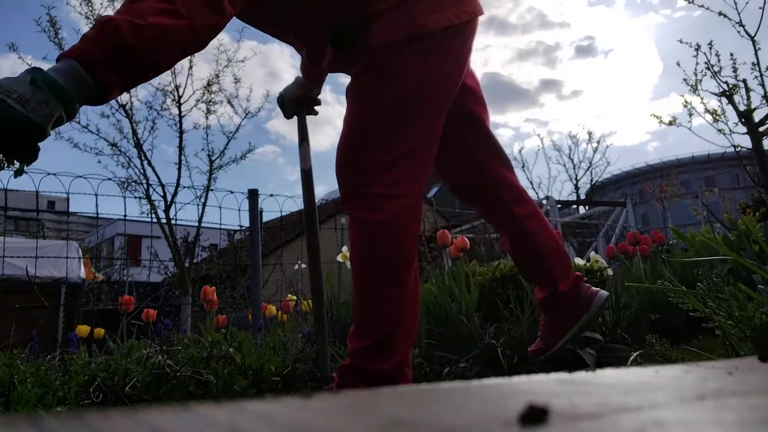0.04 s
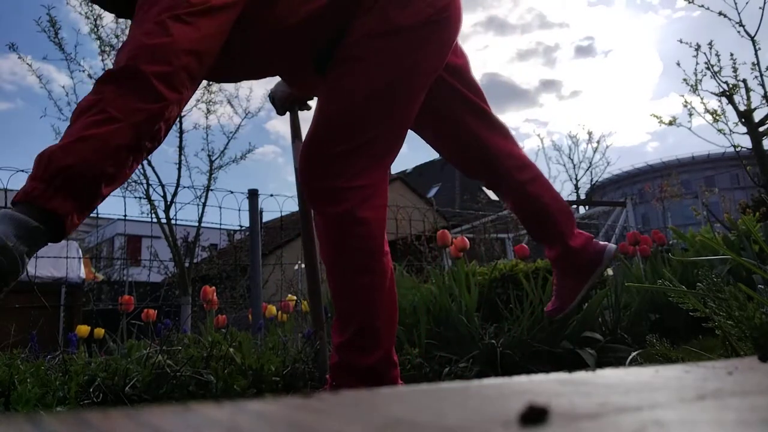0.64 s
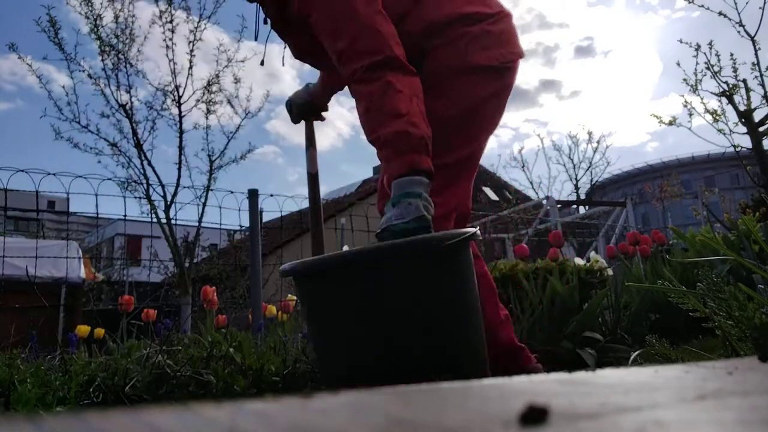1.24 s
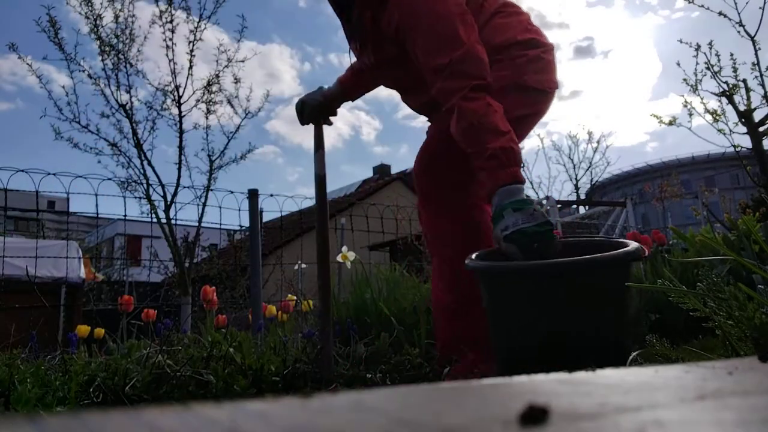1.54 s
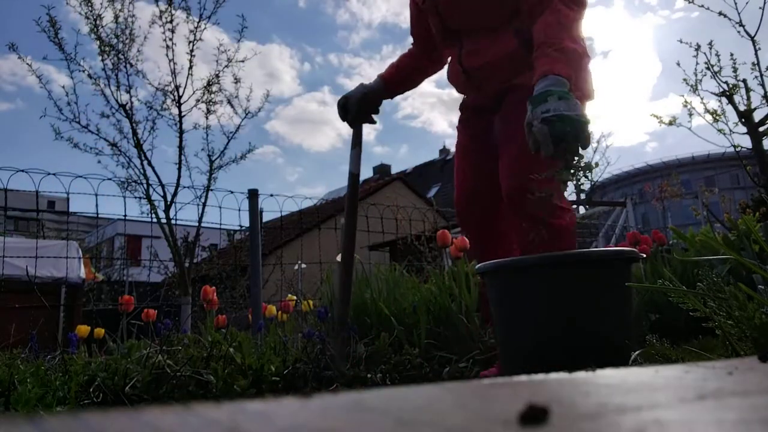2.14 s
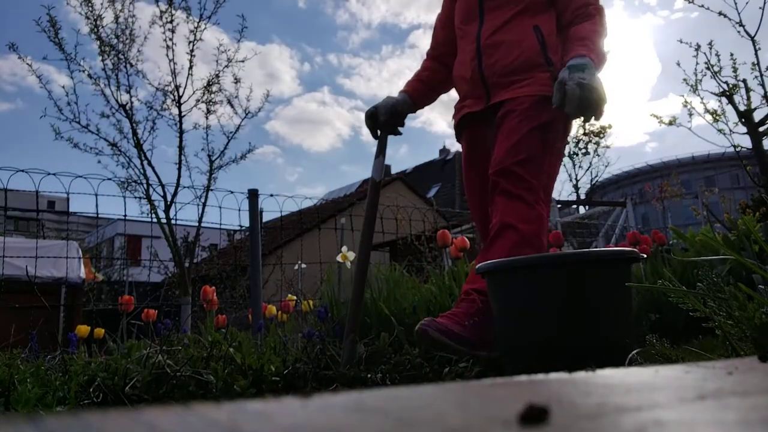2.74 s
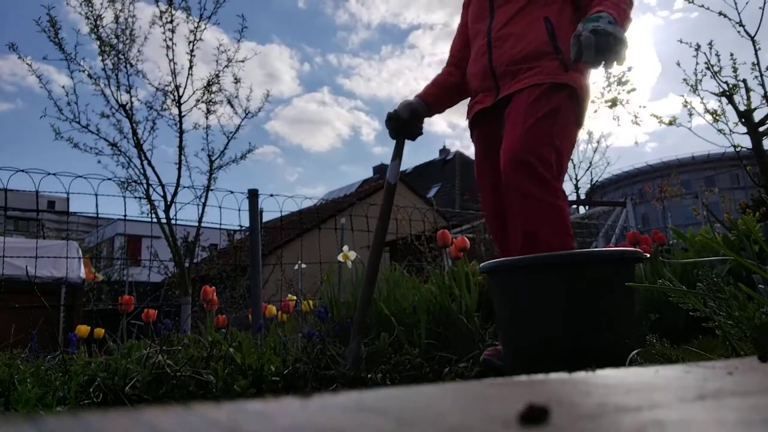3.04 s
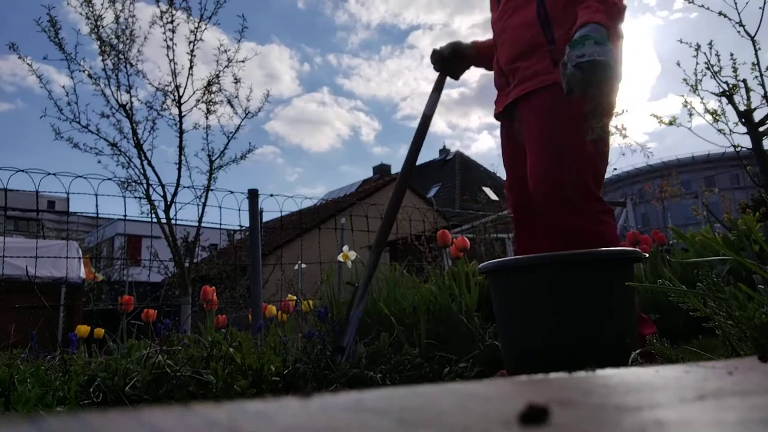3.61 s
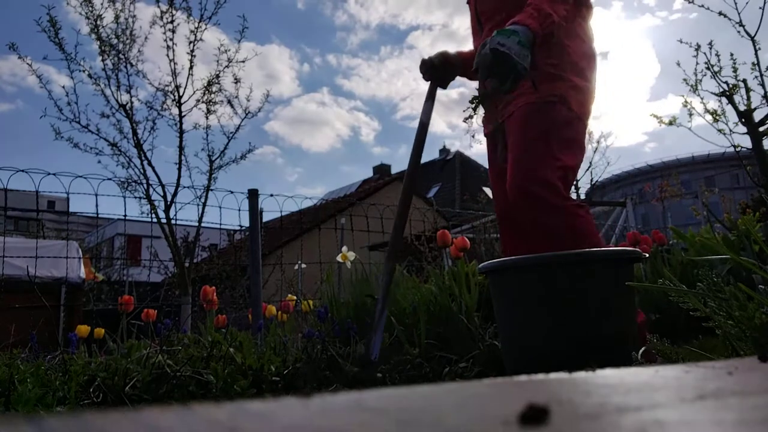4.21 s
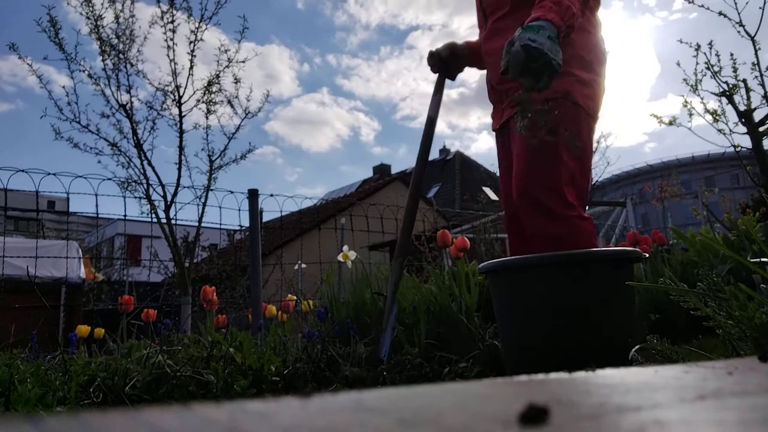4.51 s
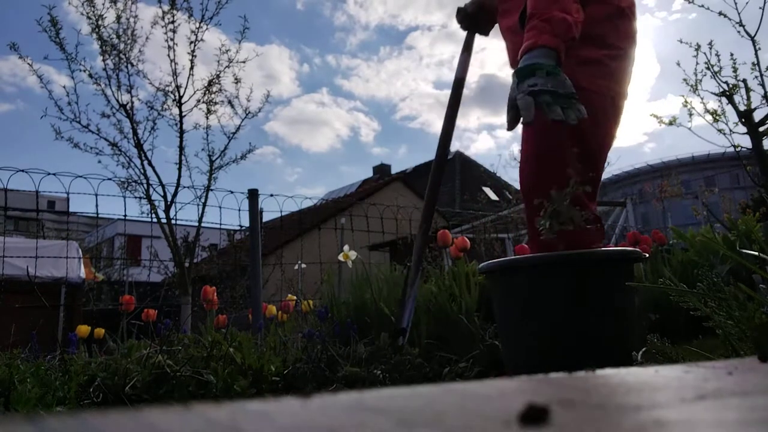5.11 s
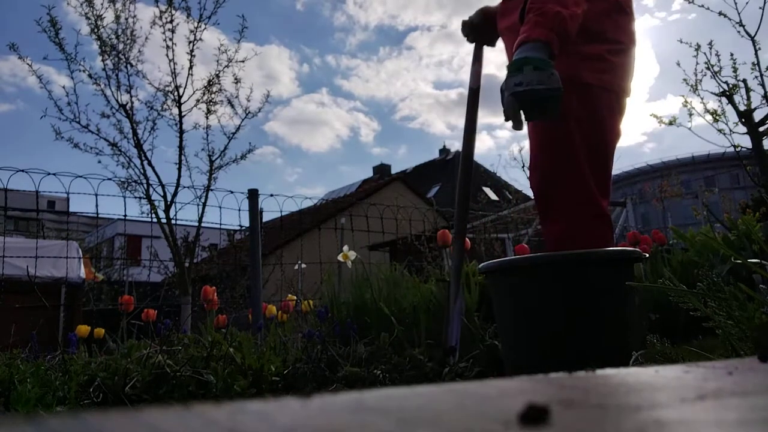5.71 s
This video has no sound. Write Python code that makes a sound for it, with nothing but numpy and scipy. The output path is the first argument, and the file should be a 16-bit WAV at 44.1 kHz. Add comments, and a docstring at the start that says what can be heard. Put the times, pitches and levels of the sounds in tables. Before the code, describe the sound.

Weeds and soil are handled close by in a garden. At about 0.4 seconds a steel tool scrapes briefly through grit, and stems begin to crackle and snap. The rustling and crumbling are loudest from 0.8 to 1.6 seconds, joined by several hollow knocks on a plastic tub, the hardest near 1.6. Scattered snaps follow, and the tub clatters again at 2.9. The work then grows sparse: light scrapes around 3.3 to 3.4, a dull crack at 3.8, a soft low thud at 4.8 and a small rustle at 5.3. Small songbirds chirp throughout, more quietly than the work. One sings a phrase of whistles, a buzz and a quick trill from 0.4 to 2.2 seconds and starts it again at 4.4. Far behind, traffic rumbles faintly and an engine hum rises slightly, then slowly runs down.

```python
"""Weeding with a plastic tub

A gardener shakes out weeds, drags and bumps a plastic tub and works a steel tool into the soil.
Crumbs, stems and leaves crackle with tiny fractures, twigs snap, the tub's wall knocks hollowly
and the tool scrapes through grit. Small songbirds trill and chirp in gliding tones from the trees,
and a far engine slowly runs down over a rumble of traffic."""
import sys
import numpy as np
from scipy import signal
from scipy.fft import rfft, irfft, next_fast_len
from scipy.io import wavfile
from scipy.ndimage import uniform_filter1d, map_coordinates

SR = 44100
rng = np.random.default_rng(int(sys.argv[2]) if len(sys.argv) > 2 else 0)


def to_wav(sig):
    """Store sig (one row per channel, or 1-D mono) as 16-bit WAV at the path in sys.argv[1].

    Samples outside -1..1 are clipped; the rate is SR.
    """
    pcm = np.clip(np.atleast_2d(sig), -1, 1) * 32767
    pcm = np.round(pcm).astype(np.int16)
    wavfile.write(sys.argv[1], SR, pcm.T)  # frames by channels


N = 262836
TIME = np.arange(N) / SR


def amp(db):
    """Decibels to gain."""
    return 10 ** (np.asarray(db) / 20)


def unit_rms(x):
    """Scales to an rms of 1."""
    return x / np.sqrt(np.mean(x ** 2) + 1e-20)


def add(mix, start_s, sound):
    """Lays a sound into the mix."""
    part = mix[max(round(start_s * SR), 0):][:len(sound)]
    part += sound[:len(part)]


def colour(x, curve):
    """Equalises x along a curve of (freq_hz, gain_db) points."""
    hz, db = np.transpose(curve)
    size = next_fast_len(len(x))
    bins_hz = np.fft.rfftfreq(size, 1 / SR)
    gain = amp(np.interp(np.log(bins_hz + 1), np.log(hz + 1), db))
    return irfft(rfft(x, size) * gain, size)[:len(x)]


def band(x, low_hz, high_hz, order=2):
    """Causal band-pass."""
    edges_hz = [low_hz, min(high_hz, SR / 2 - 1)]
    return signal.sosfilt(signal.butter(order, edges_hz, "band", fs=SR, output="sos"), x)


def wander(per_s, samples=N):
    """Smooth random drift, rms near 1, that changes per_s times a second."""
    knots = rng.standard_normal(4096)
    return map_coordinates(knots, [np.arange(samples) * per_s / SR], order=3, mode="wrap")


def swell(peak_s, rise_s, fall_s):
    """The envelope of a push: it builds to its peak and dies away."""
    t = TIME - peak_s
    return np.exp(-np.minimum(np.where(t < 0, (t / rise_s) ** 2, t / fall_s), 20))


# The engine's run: time_s, firing_hz, level_db
ENGINE_RUN = [(0, 121.5, -43), (.202, 127, -51.5), (0.35, 133.4, -40.5), (0.659, 142.2, -52),
              (1.101, 143.9, -57.5), (2.002, 130.4, -53), (2.701, 122.2, -57), (3.6, 115.6, -62),
              (4.199, 110.8, -52.5), (4.55, 103.9, -65), (5.201, 98.5, -54), (5.6, 101, -77)]
# Partials of its hum: firing_multiple, level_db
ENGINE_ORDERS = [(.5, -8.5), (1, -1.5), (1.5, -22), (2, -12)]

def engine(gain_db=-1):
    """A far engine hums at multiples of its firing rate, picks up briefly and runs down."""
    time_s, firing_hz, level_db = np.transpose(ENGINE_RUN)
    cycles = np.cumsum(np.interp(TIME, time_s, firing_hz) * (1 + 0.01 * wander(22))) / SR
    hum = sum(amp(db + 3.1 * wander(9.2)) * np.sin(2 * np.pi * multiple * cycles)
              for multiple, db in ENGINE_ORDERS)
    return np.sqrt(2) * hum * amp(np.interp(TIME, time_s, level_db) + gain_db)


# Ebb and flow of the traffic: time_s, level_db
TRAFFIC_LEVEL = [(0, -48.5), (1.2, -49), (2.7, -58), (4.6, -59), (5.1, -56), (5.6, -59.5)]
# Its bass-heavy tone: freq_hz, gain_db
TRAFFIC_EQ = [(25, -40), (38, -16), (48, -5), (70, 4), (110, 1.5), (190, -1.5), (260, -5.5), (400, -30),
              (800, -35.5)]

def traffic(gain_db=-1):
    """Far traffic blurs into a low rumble of noise."""
    rumble = unit_rms(colour(rng.standard_normal(N), TRAFFIC_EQ + [(3000, -74.0)]))
    return rumble * amp(np.interp(TIME, *np.transpose(TRAFFIC_LEVEL)) + gain_db)


# Hollow, uneven tone of the faint background hiss: freq_hz, gain_db
HISS_EQ = [(250, -3.5), (480, 7.5), (680, -24), (840, 3), (1100, -33.5), (1330, -36), (1520, -10),
           (2000, -22.5), (2400, -14), (3200, -1), (4200, -1), (5700, -10), (6500, -16), (7400, -12.5),
           (8300, -31.5)]

def hiss(level_db=-68.5, flicker_db=3.6):
    """A faint, flickering background hiss."""
    noise = unit_rms(colour(rng.standard_normal(N), HISS_EQ))
    return noise * amp(level_db + flicker_db * wander(30))


def grains(per_s, spread_db, decay_s, colours=16):
    """Many tiny fractures of uneven size, each with one of a few random colours."""
    t = np.arange(256) / SR
    sizes = amp(spread_db * np.minimum(rng.exponential(1, N), 4))
    hits = sizes * (rng.random(N) < per_s / SR)
    kind = rng.integers(0, colours, N)
    bursts = rng.standard_normal((colours, len(t))) * np.exp(-t / decay_s)
    out = sum(signal.oaconvolve(hits * (kind == k), bursts[k])[:N] for k in range(colours))
    return out / np.sqrt(uniform_filter1d(out ** 2, size=1300) + 1e-6)  # evens out the loudness


# How hard the plants are handled: time_s, effort_db
EFFORT_CURVE = [(0.0, -60.5), (0.45, -60.5), (0.58, -51.5), (1.01, -52.5), (1.44, -44), (1.59, -49.5),
                (1.99, -68), (2.36, -56.5), (2.67, -74.5), (2.92, -73), (3.09, -71), (3.29, -64),
                (3.5, -66), (3.93, -67.5), (4.18, -79), (5.31, -84.5), (5.45, -84.5), (5.96, -85)]

def effort_db(time_s):
    """The gardener's effort, which drives the steady rustle and the lesser snaps."""
    return np.interp(time_s, *np.transpose(EFFORT_CURVE))


# Quick strokes, leafy when bright and earthy when dark: peak_s, fall_s, effort_db, brightness_db
RUSTLE_STROKES = [(.31, 0.032, -69.5, 23), (.432, 0.035, -54, -6), (0.852, 0.065, -42.5, 1),
                  (.941, 0.0082, -44, 3), (.975, 0.079, -37, 1), (1.185, 0.028, -32, -1),
                  (1.266, .035, -50, -10), (1.363, 0.021, -34, 1.5), (1.471, 0.026, -39, 1.5),
                  (1.563, .035, -39.5, -2.5), (1.605, 0.0067, -35.5, 2), (1.957, 0.068, -51.5, -0.5),
                  (2.709, .05, -61.5, 7.5), (2.874, 0.0069, -49.5, 4.5), (2.927, 0.026, -38.5, -7.5),
                  (3.286, 0.015, -53.5, 0), (3.88, 0.14, -67, 5), (4.075, 0.035, -65.5, 11.5),
                  (5.321, 0.058, -60, -1)]
# Tone of the crackle: freq_hz, gain_db
RUSTLE_EQ = [(100, -12.5), (190, -2.5), (290, 6.5), (400, 3), (750, 1.5), (1150, -15.5), (2200, -16),
             (3000, -19.5), (7500, -20), (8300, -34)]
# Soil crumbs, stems and leaves: low_hz, high_hz, gain_db, brightness_share
RUSTLE_BANDS = [(173, 1200, 0.5, -0.83), (1100, 3000, 0, -0.34), (3500, 15000, -7.5, 1)]

def rustle(clump_db=2.5, steady_db=-0.5, rise_share=0.74):
    """One effort drives it all: soil crumbles low, stems crackle in the middle, leaves fizz on top."""
    crackle = colour(grains(per_s=2000, spread_db=1.5, decay_s=0.002), RUSTLE_EQ)
    pushes = [(amp(db) * swell(peak_s, rise_share * fall_s, fall_s), bright_db)
              for peak_s, fall_s, db, bright_db in RUSTLE_STROKES]
    pushes.append((amp(effort_db(TIME) + steady_db), 0))  # handling between the strokes
    out = np.zeros(N)
    for low_hz, high_hz, db, share in RUSTLE_BANDS:
        force = np.sqrt(sum((push * amp(share * bright_db)) ** 2 for push, bright_db in pushes))
        clumps = band(crackle, low_hz, high_hz, order=3) * amp(clump_db * wander(80))
        out += amp(db) * force * unit_rms(clumps)
    return out


def whistle(length_s, start_hz, middle_hz, end_hz, db, hoarse=0, warble_hz=0, depth_hz=0):
    """A bird's near sine glides through three pitches, shaken by hoarseness or a regular warble."""
    t = np.arange(0, length_s, 1 / SR)
    glide_hz = np.polyval(np.polyfit([0, .5, 1], [start_hz, middle_hz, end_hz], 2), t / length_s)
    warble_phase = 2 * np.pi * warble_hz * t
    hz = glide_hz + depth_hz * np.sin(warble_phase) + hoarse * 380 * wander(500, len(t))
    loudness = np.exp(hoarse * .5 * wander(250, len(t))) * (1 + 0.24 * np.cos(warble_phase))
    tone = unit_rms(loudness * np.sin(2 * np.pi * np.cumsum(hz) / SR))
    return amp(db) * tone * signal.windows.tukey(len(t), .45)


# Calls of a bird deeper in the trees: start_s, pitch_hz, level_db
CHIRRUP_CALLS = [(.003, 3620, -55), (1.837, 3896, -56), (2.394, 3933, -46.5), (3.375, 4135, -58.5),
                 (3.652, 4107, -48.5), (4.803, 4220, -49), (5.531, 4104, -56.5), (5.795, 3997, -47)]
# Notes of one call, against its pitch: delay_s, length_s, start_ratio, middle_ratio, end_ratio, gain_db
CHIRRUP_NOTES = [(0, 0.025, 1.14, 1.01, 1, -1), (.02, 0.027, 1.04, .95, .84, 1),
                 (.052, 0.023, .9, .91, .82, -2), (.078, 0.022, 0.9, 0.71, 0.79, -7.5)]

def chirrups():
    """Each call tumbles down through four hoarse notes."""
    out = np.zeros(N)
    for start_s, pitch_hz, db in CHIRRUP_CALLS:
        for delay_s, length_s, *ratios, gain_db in CHIRRUP_NOTES:
            glide_hz = pitch_hz * np.array(ratios)
            add(out, start_s + delay_s, whistle(length_s, *glide_hz, db + gain_db, hoarse=0.51))
    return out


def twitter(softest_db=-74, count=70):
    """Many far birds: short slurs at random moments and pitches."""
    out = np.zeros(N)
    for when, pitch, slope, size in rng.random((count, 4)):
        hz = 3100 * 2 ** (.9 * pitch ** 2)
        glide_hz = 650 * (2 * slope - 1)
        slur = whistle(0.018, hz - glide_hz, hz, hz + glide_hz / 2, softest_db + 10 * size)
        add(out, when * N / SR, slur)
    return out


def snap(db, centre_hz, decay_s, band_ratio=1.565, debris_per_s=330):
    """A break is one damped pulse with a spray of debris; a longer spray carries more of the energy."""
    t = np.arange(3000) / SR
    spray = rng.standard_normal(len(t)) * np.exp(-t / decay_s) * (1 - np.exp(-t / .001))
    blow = (t == 0) + np.sqrt(debris_per_s * decay_s) * spray / np.linalg.norm(spray)
    body = unit_rms(band(blow, centre_hz / band_ratio, centre_hz * band_ratio))
    tick_db = min(-17.5 + 4 * np.log2(centre_hz / 1200), 0)  # thin stems tick more than heavy clods
    crack = body + amp(tick_db) * unit_rms(band(blow, 1500, 6400))
    return amp(db) * crack / np.linalg.norm(crack) * np.sqrt(SR / 100)  # level over 10 ms


# Stems, twigs and clods that break loudest, and a tick of the tool at 3.435 s: start_s, level_db, centre_hz,
# debris_decay_s
LOUD_SNAPS = [(.409, -49, 1970, 0.002), (.466, -44.5, 2450, 0.0014), (0.506, -44, 1930, 0.0025),
              (.548, -46, 2100, 0.011), (.589, -43, 2850, .002), (0.682, -39, 1600, 0.0059),
              (.726, -42.5, 1590, .003), (.81, -42.5, 2450, .0025), (0.828, -40.5, 2020, 0.0097),
              (.895, -32, 1460, 0.016), (0.932, -34, 1675, 0.0029), (1.2399, -32.5, 1367, 0.006),
              (1.342, -41.5, 1800, .006), (1.564, -28, 1078, 0.0048), (1.586, -36, 1500, .009),
              (1.789, -40, 596.6, 0.0099), (1.969, -43, 1480, 0.0084), (2.284, -45.5, 918, 0.0029),
              (2.417, -35.5, 1100, .0027), (3.435, -49.5, 4500, 0.0044), (3.81, -40, 701, 0.0042),
              (3.8263, -35, 720, 0.0024), (4.758, -57, 1159, 0.0057), (5.318, -50.5, 700, 0.0097)]

def snaps(lesser_count=70, lesser_db=-5, spread_db=6.5):
    """The loud breaks, and many lesser ones at random moments, as strong as the handling is."""
    out = np.zeros(N)
    for start_s, db, centre_hz, decay_s in LOUD_SNAPS:
        add(out, start_s, snap(db, centre_hz, decay_s))
    for when, size, pitch in rng.random((lesser_count, 3)):
        start_s = when * N / SR
        db = effort_db(start_s) + lesser_db + spread_db * size
        add(out, start_s, snap(db, centre_hz=1620 * 2 ** (2 * pitch - 1), decay_s=0.002))
    return out


# The tool grates in the soil: peak_s, rise_s, fall_s, level_db
TOOL_SCRAPES = [(.44, 0.024, 0.065, -47.5), (3.268, 0.077, 0.043, -63), (3.437, 0.011, 0.012, -45),
                (4.058, 0.05, 0.066, -71)]
# Narrow ringing peaks that colour the gritty scrape: freq_hz, width_hz, gain_db
SCRAPE_PEAKS = [(2100, 32, 10.5), (2574, 130, 9), (5530, 330, 5.5)]

def tool():
    """Grit slips along the tool in short scrapes with a thin, ringing tone."""
    grit = grains(per_s=1800, spread_db=3, decay_s=.0005)
    ring = sum(amp(db) * unit_rms(band(grit, hz - width_hz / 2, hz + width_hz / 2, order=1))
               for hz, width_hz, db in SCRAPE_PEAKS)
    return unit_rms(ring) * sum(amp(db) * swell(*timing) for *timing, db in TOOL_SCRAPES)


# The lead bird sings its song twice: start_s, spacing_ratio, gain_db
SONG_CUES = [(.425, .993, -2.5), (4.397, 1, 0)]
# Opening whistles: delay_s, length_s, start_hz, middle_hz, end_hz, level_db
SONG_WHISTLES = [(0, .033, 3170, 4060, 4140, -51), (.085, .042, 5450, 5870, 5610, -50),
                 (.19, .027, 3220, 4200, 4620, -54), (0.375, 0.06, 5500, 5170, 4976, -48),
                 (.426, 0.024, 2940, 3680, 4260, -47.5), (0.476, .027, 4670, 4820, 5830, -47),
                 (.491, .033, 5640, 5830, 5700, -43.5), (0.614, 0.029, 7860, 7100, 6560, -51.5),
                 (.64, .009, 5630, 5160, 4940, -47)]
# Buzzing slurs: delay_s, length_s, start_hz, middle_hz, end_hz, level_db, warble_hz, depth_hz
SONG_BUZZES = [(.68, .15, 4300, 4187, 4107, -55, 220, 200), (1.575, .12, 5790, 5500, 4400, -54, 150, 634),
               (1.668, .16, 4422, 3800, 3850, -56.5, 88, 220)]
# Two voices of each trill note: length_s, start_hz, middle_hz, end_hz, level_db
TRILL_VOICES = [(0.032, 4450, 3550, 2850, -53.5), (.014, 6400, 5550, 5500, -60.5)]

def singer(trill_notes=7, trill_delay_s=.941, trill_period_s=.0694, spread_db=0.3):
    """Whistles, a buzz, an even trill from both sides of the syrinx, then two closing slurs."""
    out = np.zeros(N)
    for start_s, spacing, song_db in SONG_CUES:
        notes = [(delay_s, whistle(*note, hoarse=.18)) for delay_s, *note in SONG_WHISTLES]
        notes += [(delay_s, whistle(*note, warble_hz=warble_hz, depth_hz=depth_hz))
                  for delay_s, *note, warble_hz, depth_hz in SONG_BUZZES]
        for k, gain in enumerate(amp(-spread_db * rng.standard_normal(trill_notes))):
            delay_s = trill_delay_s + k * trill_period_s
            notes += [(delay_s, gain * whistle(*voice, hoarse=.12)) for voice in TRILL_VOICES]
        for delay_s, note in notes:
            add(out, start_s + spacing * delay_s, amp(song_db) * note)
    return out


# Bumps against the tub: start_s, level_db, brightness_hz
TUB_BUMPS = [(.976, -38, 350), (1.179, -38, 350), (1.187, -32, 401), (1.357, -43, 520), (1.472, -43.5, 400),
             (1.545, -39, 400), (1.563, -28, 390), (2.902, -31, 900), (2.918, -41, 2500),
             (2.928, -42.5, 3500), (2.9433, -33, 1400)]
# Hollow ring of its wall: freq_hz, gain_db, t60_s
TUB_MODES = [(252, -15, 0.097), (283, 8, 0.04), (349, 6, 0.023), (483, -13.5, 0.14), (527.6, -3.5, 0.064),
             (530, -13, .08), (736.7, 7, 0.045), (760.5, 6, 0.067), (1100, 1.5, 0.041), (1267, -7.5, 0.073),
             (1500, -9, 0.059), (1754, -11, 0.17), (2630, 1.5, 0.045)]

def tub(grit=0.043):
    """A soft, gritty blow rings the plastic wall; harder blows reach higher modes."""
    out, t = np.zeros(N), np.arange(9000) / SR
    for start_s, db, bright_hz in TUB_BUMPS:
        ring = np.zeros(len(t))
        for hz, mode_db, t60_s in TUB_MODES:
            sign = rng.choice([-1, 1])  # set by where the blow lands
            drive = sign / (1 + (hz / bright_hz) ** 2)
            ring += drive * amp(mode_db - 60 * t / t60_s) * np.sin(2 * np.pi * hz * t)
        blow = (t == 0) + grit * rng.standard_normal(len(t)) * np.exp(-t / 0.0053)
        knock = signal.fftconvolve(blow, ring)[:len(t)]
        add(out, start_s, amp(db) * knock / np.linalg.norm(knock) * np.sqrt(SR / 50))  # level over 20 ms
    return out


# Weight shifting on the ground: peak_s, rise_s, fall_s, level_db
WEIGHT_SHIFTS = [(1.19, 0.014, 0.017, -43), (4.77, 0.014, 0.12, -45)]

def treads():
    """Soft ground thuds dully underfoot."""
    thud = unit_rms(band(rng.standard_normal(N), 65, 110))
    return thud * sum(amp(db) * swell(*timing) for *timing, db in WEIGHT_SHIFTS)


# Pips from deeper in the trees: start_s, pitch_hz, level_db
PIP_CALLS = [(2.822, 4100, -62), (3.858, 3620, -53), (3.965, 5750, -61.5), (4.091, 4040, -55.5),
             (4.362, 3970, -57), (4.698, 5970, -61), (4.998, 3640, -53.5)]

def pips(length_s=.024, step_hz=370):
    """Neighbouring birds call in short, nearly pure rising notes."""
    out = np.zeros(N)
    for start_s, hz, db in PIP_CALLS:
        add(out, start_s, whistle(length_s, hz - step_hz, hz, hz + step_hz, db, hoarse=0.067))
    return out


def garden(x, t60_s, wet_db, echoes_per_s=1500):
    """Adds sparse echoes from walls, fence and trees."""
    t = np.arange(SR // 2) / SR
    taps = rng.standard_normal(len(t)) * (rng.random(len(t)) < echoes_per_s / SR)
    taps *= (t > .006) * amp(-60 * t / t60_s)
    return x + amp(wet_db) * signal.oaconvolve(x, taps / np.linalg.norm(taps))[:N]


# The whole mix ducks briefly in the quiet: centre_s, depth_db
LEVEL_DIPS = [(2.801, 20), (3.493, 16), (3.621, 22), (4.554, 23), (5.664, 23), (5.737, 27.5), (5.931, 44.5)]

def scene():
    """Garden work up close, birds further off, and the town behind."""
    work = garden(snaps() + tub() + tool() + treads(), t60_s=0.2, wet_db=-13) + rustle()
    neighbours = chirrups() + pips()
    birds = singer() + amp(-2) * garden(neighbours, t60_s=0.18, wet_db=-5) + twitter()
    far_echoes = band(garden(birds, t60_s=1.0, wet_db=-12) - birds, 3900, 5000)  # foliage dulls them
    birds = garden(birds, t60_s=0.084, wet_db=-10) + far_echoes
    mix = work + birds + engine() + traffic() + hiss()
    dip_db = sum(depth_db * np.exp(-((TIME - centre_s) / 0.015) ** 2)
                 for centre_s, depth_db in LEVEL_DIPS)
    return (mix * amp(-dip_db))[None]


# Resonances of the microphone's housing: freq_hz, width_hz, gain_db
HOUSING_MODES = [(808, 39, 4), (1475, 41, 4.5), (1900, 85, -3), (2100, 24, 3), (2640, 110, 3.5),
                 (5960, 96, -8), (5870, 140, 0)]

def record(dry, cutoff_hz=8050):
    """The housing colours the sound, and a steep low-pass takes off the top."""
    heard = dry + sum((amp(db) - 1) * signal.lfilter(*signal.iirpeak(hz, hz / width_hz, fs=SR), dry)
                      for hz, width_hz, db in HOUSING_MODES)
    lowpass = signal.firwin(301, cutoff_hz, window=("kaiser", 8), fs=SR)
    return amp(-1) * signal.oaconvolve(heard, lowpass[None], "same")


dry = scene()
out = record(dry)
to_wav(out)
```